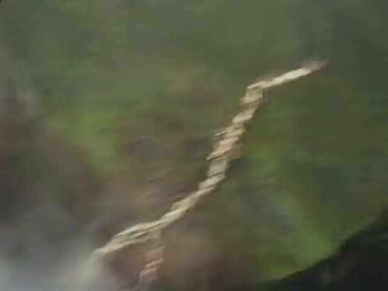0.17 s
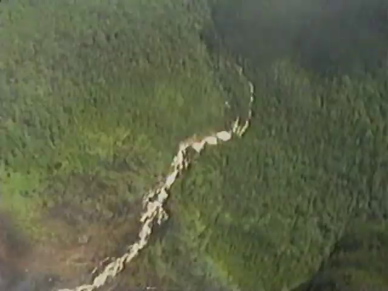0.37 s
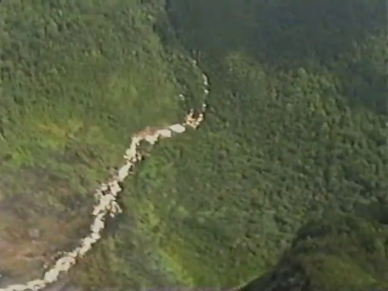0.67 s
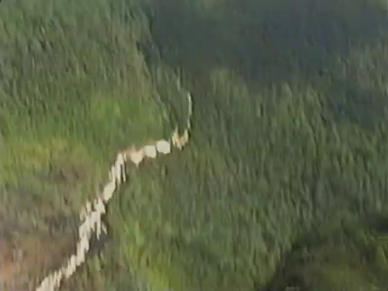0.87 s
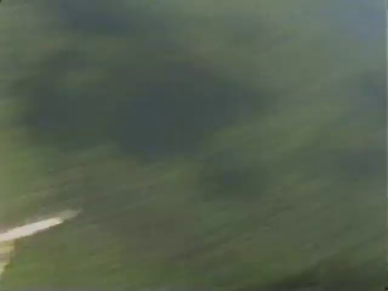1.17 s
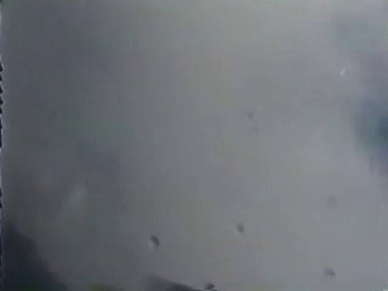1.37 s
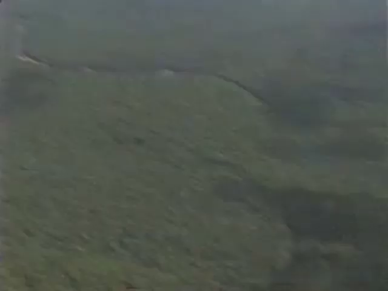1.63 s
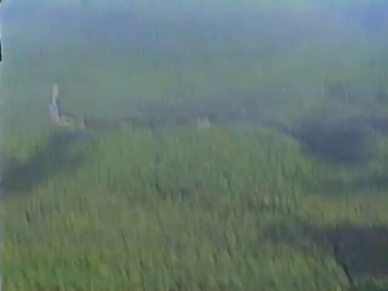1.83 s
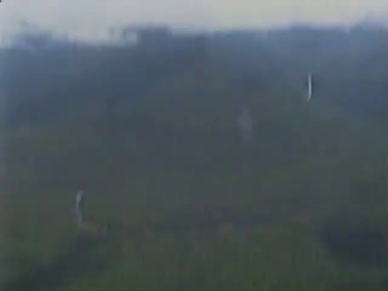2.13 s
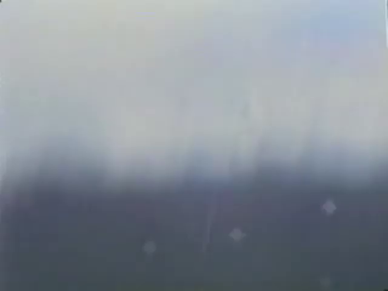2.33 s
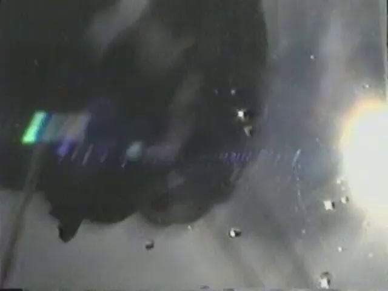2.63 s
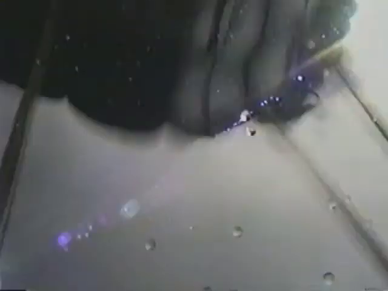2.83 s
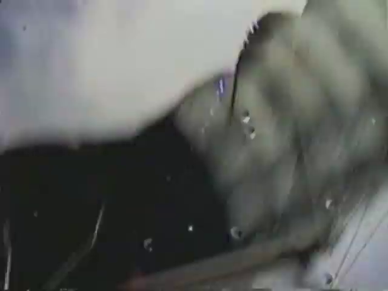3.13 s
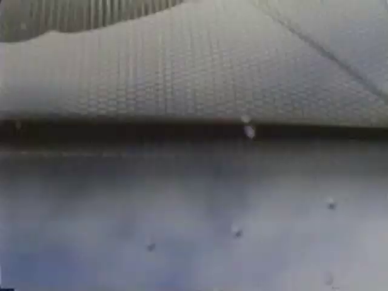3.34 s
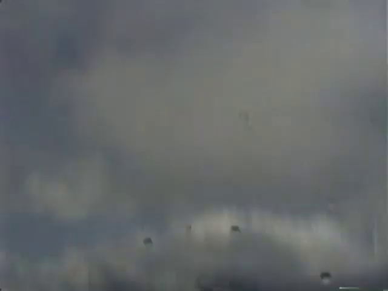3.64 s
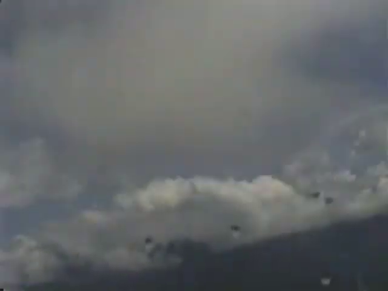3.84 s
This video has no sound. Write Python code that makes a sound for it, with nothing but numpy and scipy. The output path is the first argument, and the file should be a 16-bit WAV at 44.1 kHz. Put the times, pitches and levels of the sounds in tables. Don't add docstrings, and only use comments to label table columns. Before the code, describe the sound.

Harsh distorted wind batters a camera tumbling through open air, with dull hardware knocks. Sound drops out briefly at two seconds, then the wind weakens under a flapping canopy and fades to faint rustling. Close overloaded microphone.

```python
import sys
import numpy as np
from scipy import signal
from scipy.io import wavfile

SR = 44100
rng = np.random.default_rng(int(sys.argv[2]) if len(sys.argv) > 2 else 0)


def boost(x):
    u = np.asarray(x, float) / 20
    return 10 ** u


def materialize(psi):
    bounded = np.clip(np.atleast_2d(psi).T, -1, 1)
    quanta = np.round(bounded * 32767).astype(np.int16)
    wavfile.write(sys.argv[1], SR, quanta)


N = 176400
CEILING = .41


def rms_one(x):
    return x / np.sqrt(np.mean(x ** 2) + 1e-20)


def in_time(rows):
    s, *columns = np.transpose(rows)
    return [np.interp(np.arange(N) / SR, s, c) for c in columns]


def at_hz(points, hz):
    point_hz, point_db = np.transpose(points)
    return np.interp(np.log(hz), np.log(point_hz), point_db)


def drift(rate):
    r = np.exp(-80 * np.pi * rate / SR)
    slow = signal.lfilter([1], [1, -2 * r, r * r], rng.standard_normal(N // 40 + 2002))
    slow = slow[2000:]
    return np.interp(np.arange(N) / 40, np.arange(len(slow)), rms_one(slow))


def band(x, low_hz, high_hz):
    return signal.sosfilt(signal.butter(2, [low_hz, high_hz], "band", fs=SR, output="sos"), x)


def puffs(times, sizes, rise_s, fall_s):
    marks, age = np.zeros(N), np.arange(SR // 10) / SR
    marks[(np.asarray(times) * SR).astype(int)] = sizes
    return signal.oaconvolve(marks, (1 - np.exp(-age / rise_s)) * np.exp(-age / fall_s))[:N]


def banded_noise(colour_db, low_hz, shared_db, own_db, rate):
    together = drift(rate) + .5 * drift(4 * rate)
    white = rng.standard_normal((2, N + SR // 2))
    edges = low_hz * 2 ** np.arange(0, np.log2(16000 / low_hz), .5)
    out, power = 0, 0
    for k, (low, high) in enumerate(zip(edges, edges[1:])):
        gain = boost(colour_db(np.sqrt(low * high)))
        flicker = boost(shared_db * together + own_db * drift(5.4))
        power = power + gain ** 2 * (high - low)
        out = out + gain * flicker * band(white[k % 2], low, high)[-N:]
    return rms_one(out / np.sqrt(power))


def wake():
    # start_s, level_db
    throb = [
        (2.3, -37),
        (2.42, -28),
        (2.62, -19),
        (2.7, -17),
        (2.8, -28),
        (3.17, -39),
        (3.205, -24),
        (3.28, -19),
        (3.32, -47),
    ]
    db, = in_time([(2.2, -68)] + throb + [(3.4, -76)])
    pitch_hz = 45.03 * (1 + 0.14 * drift(11.8))
    phase = 2 * np.pi * np.cumsum(pitch_hz) / SR
    second = .3 * np.sin(2 * phase + 1.2)
    third = 0.38 * np.sin(3 * phase + 2.9 * drift(22))
    return boost(db - 0.5 + 2.0 * drift(14)) * (np.sin(phase) + second + third)


def knocks_and_buffets():
    # start_s, peak_db, pitch_hz
    knocks = [(.239, -21, 600), (.26, -18, 596), (.329, -31, 600), (.568, -27, 600), (1.75, -27, 700),
              (2.401, -21, 800), (2.514, -19.5, 834), (2.586, -39, 790), (2.61, -24, 840),
              (2.628, -10, 600), (3.086, -18.5, 547), (3.619, -31.5, 1330), (3.621, -30, 1040),
              (3.762, -30.5, 1280), (3.805, -35.5, 1200)]
    t60_s, trim_db = 0.008, 5.5
    out, age = np.zeros(N + SR), np.arange(SR // 20) / SR
    for s, db, hz in knocks:
        i = int(s * SR)
        out[i:i + len(age)] += boost(db + trim_db - 60 * age / t60_s) * np.sin(2 * np.pi * hz * age)
    return out[:N]


def cloth_rush():
    # start_s, level_db, crispness_db_per_octave
    rush = [
        [(2.36, -74, 0), (2.44, -45, -0.5), (2.52, -61, 5), (2.57, -75, 12), (2.74, -50.5, 1),
         (2.86, -52.5, 0.5), (2.93, -53, 2), (3.02, -51, 3), (3.12, -51, 1), (3.15, -63.5, 0.5)],
        [(3.33, -71, 1), (3.38, -56, 1), (3.54, -65.5, -1), (3.59, -65, 13), (3.64, -60.5, -9), (3.7, -56, 1),
         (3.78, -69, -5.5), (4, -74, 1)],
    ]
    # pitch_hz, density_db_per_hz
    cloth_colour = [(350, -33), (600, -7.5), (1550, 3), (2560, -22.5), (4880, -12), (7840, -26.5),
                    (14000, -45)]
    creases_per_s, crease_share = 420, 0.76
    db, crisp = in_time([(2.2, -57.5, 0.0019)] + rush[0] + rush[1])
    crease_s = np.flatnonzero(rng.random(N) < creases_per_s / SR) / SR
    creases = puffs(crease_s, 1, .0004, 0.0022)
    creasing = creases * boost(1.3 * drift(40)) / creases.mean()
    grain = rms_one(1 - crease_share + crease_share * creasing)

    def colour(hz):
        return at_hz(cloth_colour, hz) + crisp * np.log2(min(hz, 8000) / 3000)

    return boost(db + 11.5) * grain * banded_noise(colour, 590, shared_db=0.7, own_db=-0.5, rate=3.3)


def fabric_rustles():
    # start_s, peak_db
    rustles = [(3.5538, -41), (3.5694, -45), (3.5786, -40), (3.586, -28.5), (3.591, -31), (3.5984, -40),
               (3.606, -36), (3.6124, -33), (3.6244, -41), (3.686, -35), (3.6984, -37), (3.7064, -39),
               (3.714, -36), (3.7244, -40.5), (3.7459, -38), (3.7927, -38), (3.8056, -38), (3.8174, -33),
               (3.824, -39), (3.839, -36), (3.848, -30), (3.8781, -38), (3.8965, -33), (3.9034, -33),
               (3.9117, -31.5), (3.9302, -33), (3.943, -31), (3.949, -33), (3.9622, -33.5), (3.9744, -36)]
    slack_until_s, slack_hz, taut_hz = 3.77, (4500, 10200), (4330, 12900)
    s, tick_db = np.transpose(rustles)
    ticks = puffs(s, boost(tick_db - 3), rise_s=0.00026, fall_s=0.0018)
    white = rng.standard_normal(N)
    slack, taut = (rms_one(band(band(white, *hz), *hz)) for hz in (slack_hz, taut_hz))
    return ticks * np.where(np.arange(N) / SR < slack_until_s, slack, taut)


def canopy_flutters():
    # start_s, peak_db, dull_share_db, length (a multiple of the usual rise and fall)
    flutters = [(2.4057, -37, 4, 1.5), (2.4392, -30, 0, 1.9), (2.4746, -31, 3, 0.91),
                (2.508, -21, -1, 0.97), (2.5386, -27, 7, 1.2), (2.596, -42, 9, 1.5), (2.628, -23.5, 2, 1.2),
                (2.6626, -30, -5, 1.1), (2.6751, -32, -11, 0.93), (2.7026, -28, -15, 1.1),
                (2.736, -40, 2, 1.5), (2.76, -32, 9, 1.4), (2.7866, -29.5, 10.5, 0.95),
                (2.82, -33, 12, 2.1), (2.8462, -27.5, 8.5, 3.6), (2.875, -39, -1, 1.1),
                (2.904, -27.5, 7.5, 1.7), (2.946, -29, 4, 1.9), (2.9759, -29, -17, 2.7),
                (2.998, -31, 6, 1.9), (3.0163, -27, 5, 1.6), (3.0468, -26, 4, 0.49), (3.088, -40, 2, 2.5),
                (3.1146, -33, -22, 0.96), (3.3596, -30.5, -5, 1.1), (3.387, -31, -18, 0.99),
                (3.421, -38, 6, 1.1)]
    rise_s, fall_s = 0.0013, 0.0043
    bright_hz, dull_hz = (2300, 8800), (820, 2040)
    bright, dull = 0, 0
    for s, db, dull_db, length in flutters:
        flap = puffs([s], boost(db), rise_s * length, fall_s * length)
        bright = bright + boost(-10.0) * flap
        dull = dull + boost(dull_db - 6.5) * flap
    white = rng.standard_normal((2, N))
    return bright * rms_one(band(white[0], *bright_hz)) + dull * rms_one(band(white[1], *dull_hz))


def gust_whistle():
    # start_s, level_db
    blast_points = [
        (1.14, -60),
        (1.19, -48),
        (1.23, -43.5),
        (1.3, -57),
        (1.5, -47),
        (1.56, -48),
        (1.587, -37),
        (1.596, -70),
    ]
    start_s, length_s, whistle_db = 1.155, 0.032, -39.5
    t = (np.arange(N) / SR - start_s) / length_s
    shape = np.interp(t, [-0.67, 0.13, 1.3, 0.68, 1.6], [0.047, 1, 1, 0.16, 0])
    white = rng.standard_normal((2, N))
    pitch_hz = np.interp(t, [0, 1], (2400, 3600))
    carrier = np.sin(2 * np.pi * np.cumsum(pitch_hz) / SR)
    whistle = rms_one(carrier * band(white[0], 27, 230))
    breath = boost(0.5) * rms_one(band(white[1], 900, 6300))
    blast_db, = in_time([(1.1, -88)] + blast_points + [(1.62, -90)])
    blast = boost(blast_db) * rms_one(band(white[1], 1500, 9900))
    return blast + boost(whistle_db) * shape * (whistle + breath)


def opposed_push():
    # start_s, level_db (over the ceiling), corner_hz
    opposed_points = [(0, 6, 330), (.1, 6, 300), (.28, 1, 200), (.4, -4, 200), (1.12, -5, 200),
                      (1.19, 3, 450), (1.26, 8.5, 420), (1.45, 8.5, 460), (1.52, 8, 440), (1.585, 4, 480),
                      (1.605, 2, 150), (1.97, 2, 180), (2.3, -2, 150), (2.48, -5, 100), (2.6, 3.5, 120),
                      (2.655, 2, 120), (2.7, -15, 90), (4, -30, 90)]
    db, corner_hz = in_time(opposed_points)

    def colour(hz):
        treble_loss = 28 * np.log10(1 + (hz / corner_hz) ** 2)
        bass_loss = 10 * np.log10(1 + (.6 * corner_hz / hz) ** 4)
        return -treble_loss - bass_loss

    return CEILING * boost(db) * banded_noise(colour, 20, shared_db=1.0, own_db=1.0, rate=8)


def shared_push():
    # start_s, level_db, brightness_db, heaviness_db
    push = [
        [(0, -11, -3.5, -8.5), (.15, -11.5, -31.5, -5), (.33, -16.5, -38, -4), (.6, -18, -17, -6.5),
         (1.12, -16.5, -23.5, -4), (1.2, -19.5, -2, -6.5), (1.3, -7.5, -9.5, -5), (1.585, -14.5, -14, -6.5),
         (1.61, -13, -29.5, -4), (1.97, -12.5, -13, -3)],
        [(2.2, -16.5, -9, -4), (2.44, -20, -24, -1.5), (2.63, -12.5, -23.5, -1.5), (2.72, -24.5, -11.5, -1),
         (3.125, -33, 1, -7.5), (3.155, -40, -12, -4), (3.28, -32.5, -22, -1.5), (3.45, -37, -11, -2),
         (4, -45, 3.5, -3)],
    ]
    # centre_s, change_db, half_length_s
    surges = [(0.022, 0.5, 0.011), (0.26, 3.5, 0.012), (.33, 1.5, .01), (0.536, -0.5, 0.014),
              (0.579, -3.5, 0.0052), (0.661, 0.5, 0.03), (1.099, -4, 0.032), (1.215, 2, 0.016),
              (1.44, 3, 0.076), (1.649, -1, 0.018), (1.764, 5, .016), (1.932, 1.5, .025),
              (2.141, -3.5, 0.015), (2.28, 2.5, 0.086), (2.403, -0.5, 0.0083), (2.565, -1.5, 0.0071),
              (2.608, 1, 0.012), (2.856, 2.5, 0.021), (2.945, -7, 0.014), (3.69, 1.5, 0.043)]
    # pitch_hz, density_db_per_hz
    eddies = [(12, -31), (20, -2.5), (129, -1), (310, -4), (508, -10.5), (1740, -23.5), (3460, -38),
              (8790, -40.5), (14000, -59)]
    db, bright, heavy = in_time(push[0] + push[1])
    t = np.arange(N) / SR
    surge = sum(change_db * np.exp(-((t - s) / half_s) ** 2) for s, change_db, half_s in surges)
    db, bright = db + surge, bright + 0.94 * surge
    tilt = 0.2162 * (bright + 10.5)
    sag = 1.5 * (heavy + 5)

    def colour(hz):
        brighter = tilt * np.log2(np.clip(hz, 350, 1300) / 350)
        heavier = sag * np.log2(200 / np.clip(hz, 50, 200))
        return at_hz(eddies, hz) + brighter + heavier

    return boost(db) * banded_noise(colour, 19.51, shared_db=1.01, own_db=1.2, rate=17)


def capsule(x):
    knee = 4.0
    return x / (1 + np.abs(x / CEILING) ** knee) ** (1 / knee)


def scene():
    canopy = cloth_rush() + fabric_rustles() + canopy_flutters()
    alike = shared_push() + canopy + knocks_and_buffets() + wake()
    opposed = opposed_push()
    mono = .5 * (capsule(alike + opposed) + capsule(alike - opposed))
    return (mono + boost(-40) * alike + gust_whistle())[None]


def roll_off(x):
    return signal.sosfilt(signal.butter(12, 15700, fs=SR, output="sos"), x)


def record(dry):
    mute_s, step_s, unmute_s = 1.981, 2.0247, 2.0962
    held_before, held_after = .0108, .0054
    hiss = boost(-51) * band(rng.standard_normal(dry.shape), 100, 11000)
    x = band(dry + hiss, 7, 9720)
    t = np.arange(N) / SR
    held = np.interp(t, step_s + np.array([-.0005, -.00042, .0012]), [held_before, .78 * held_before, held_after])
    ring = .0009 * np.exp(-((t - step_s) / .0006) ** 2) * np.sin(2 * np.pi * 6300 * t)
    on = np.interp(t, [mute_s - .006, mute_s + .001, unmute_s - .0002, unmute_s], [1, 0, 0, 1])
    tape_edge = signal.butter(10, 14500, fs=SR, output="sos")
    x = signal.sosfilt(tape_edge, on * x + (1 - on) * (held + ring))
    return roll_off(x)


dry = scene()
out = record(dry)
materialize(out)
```